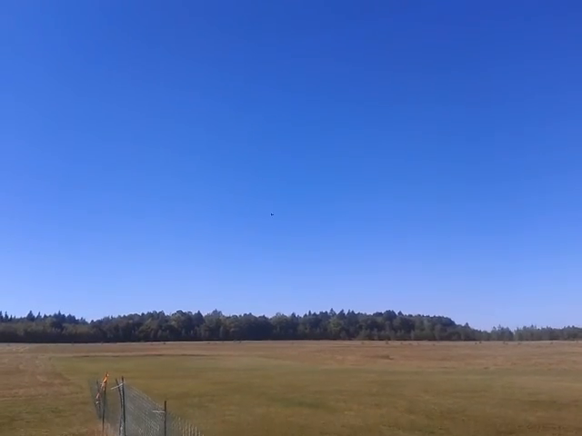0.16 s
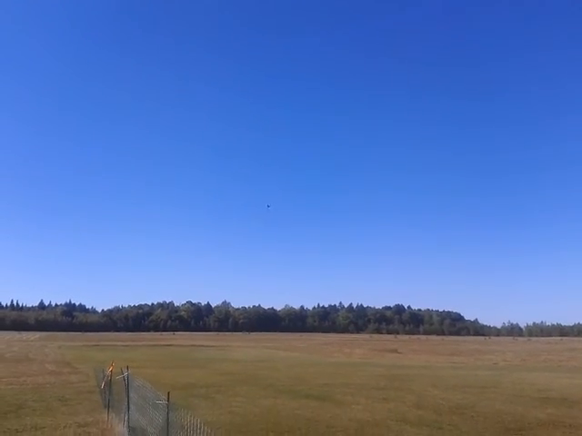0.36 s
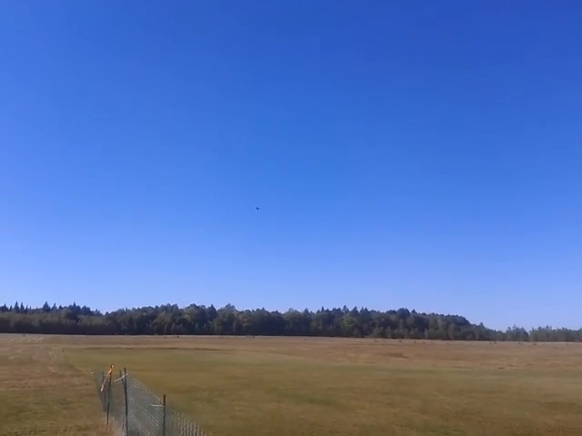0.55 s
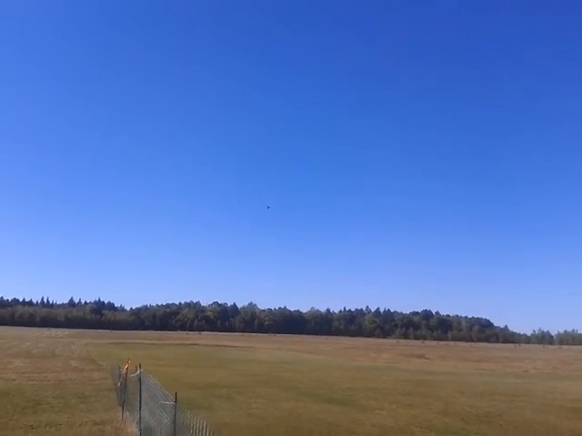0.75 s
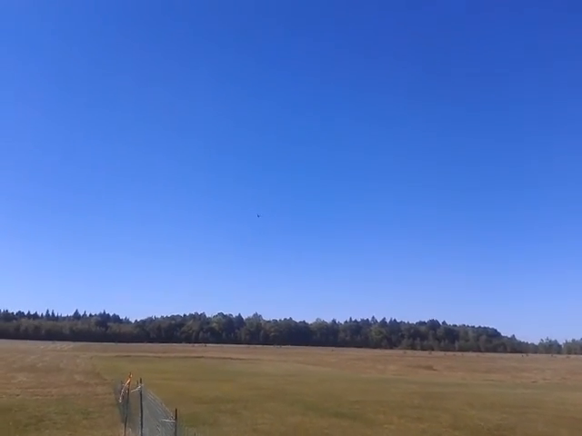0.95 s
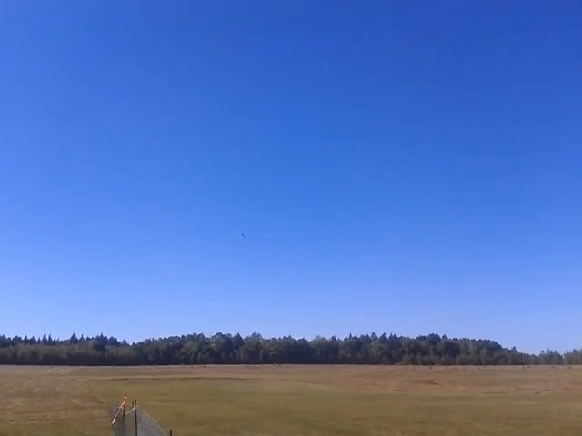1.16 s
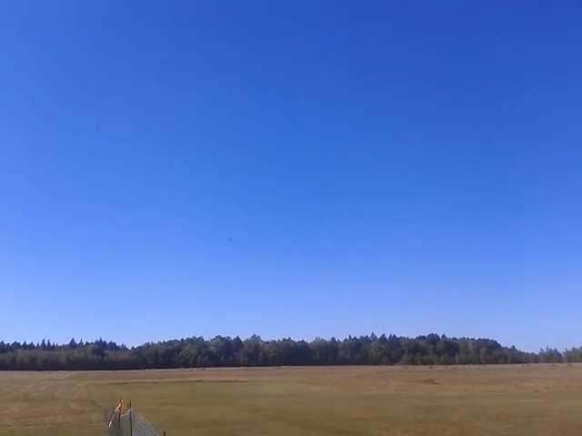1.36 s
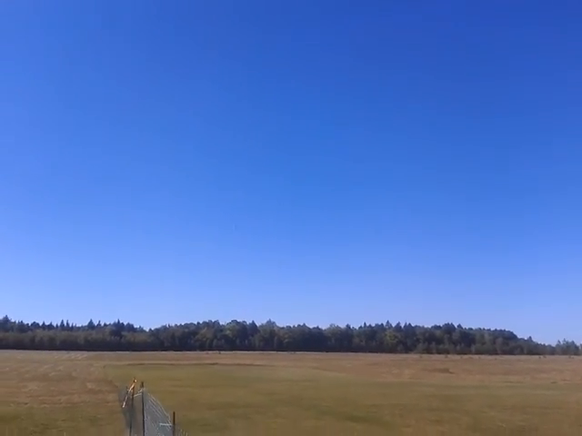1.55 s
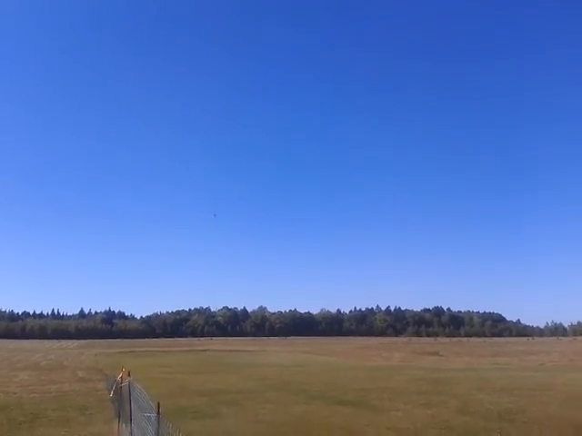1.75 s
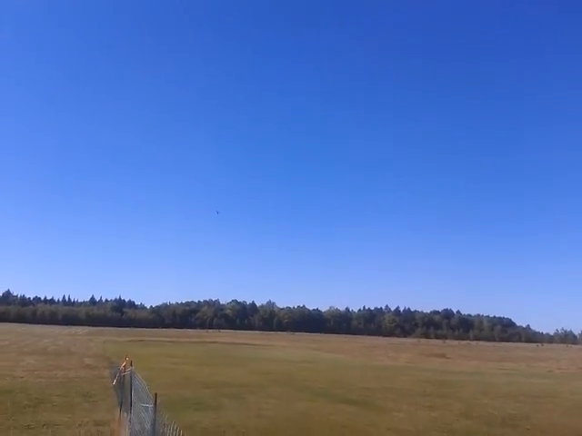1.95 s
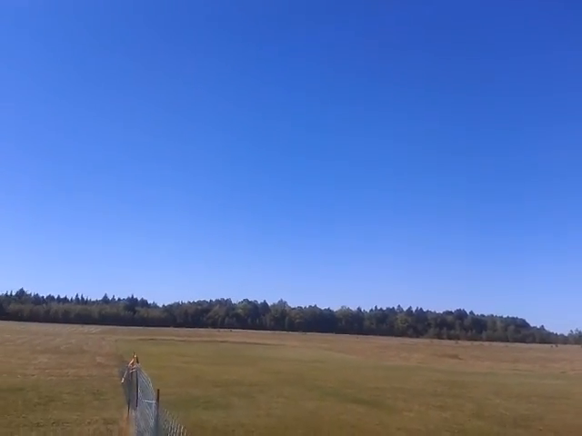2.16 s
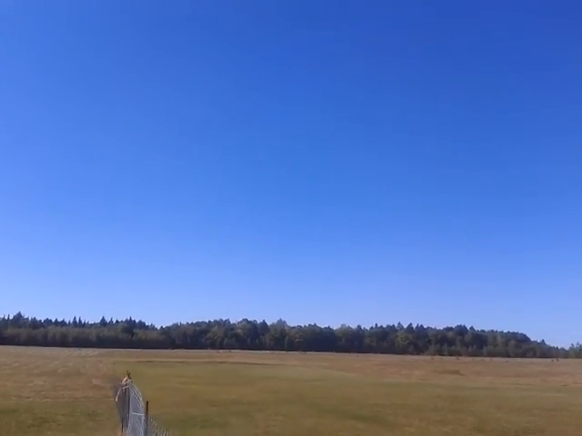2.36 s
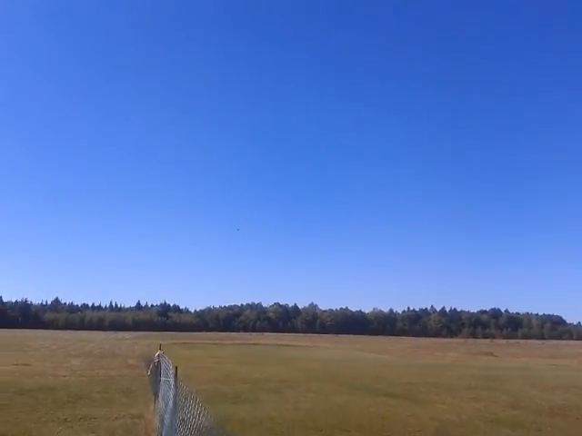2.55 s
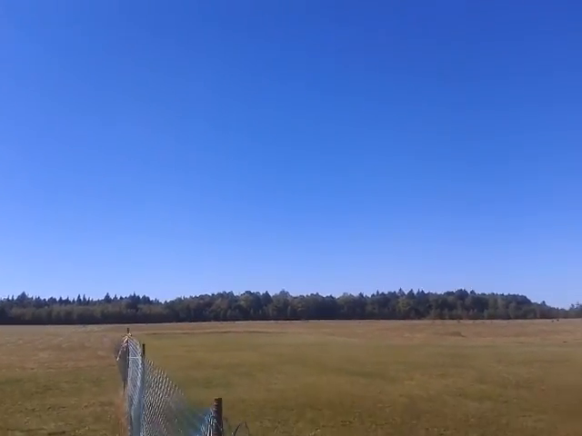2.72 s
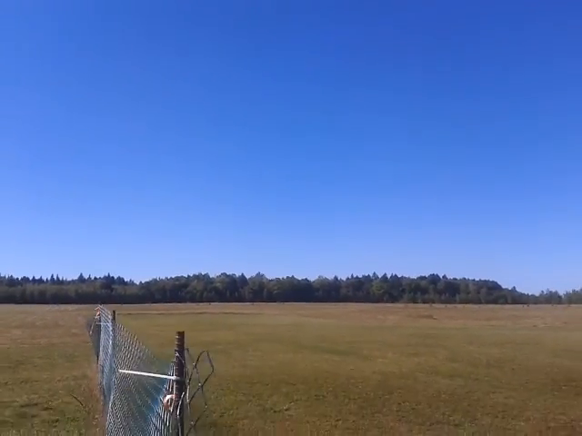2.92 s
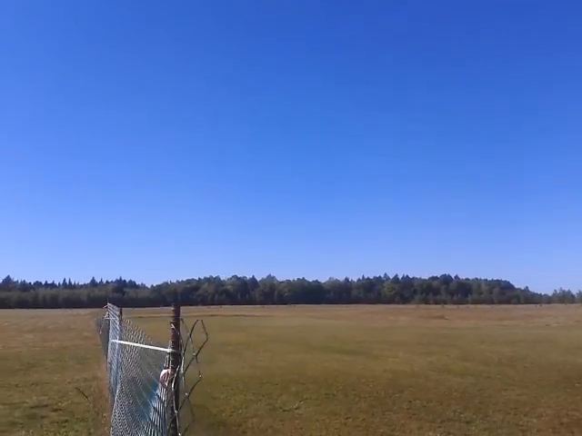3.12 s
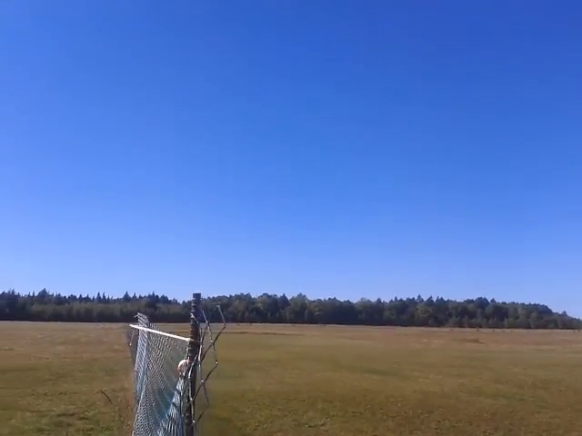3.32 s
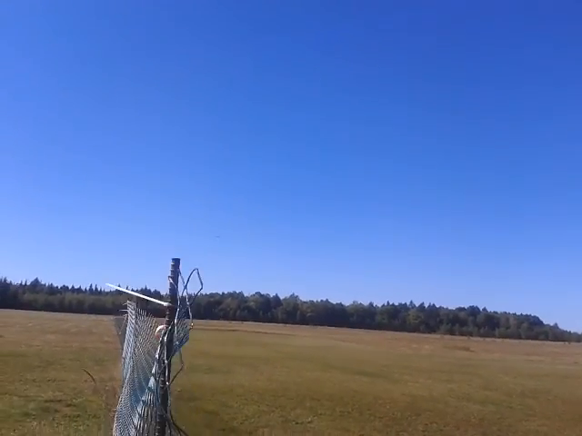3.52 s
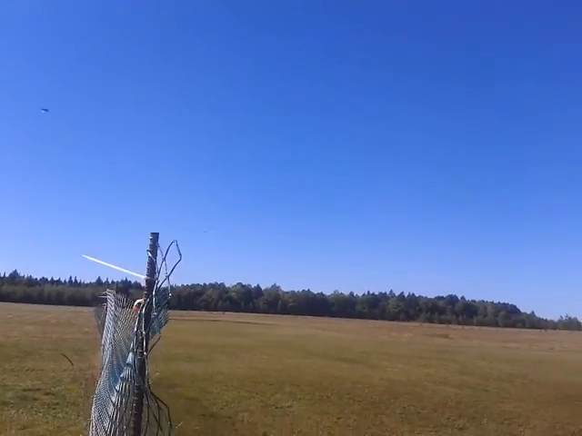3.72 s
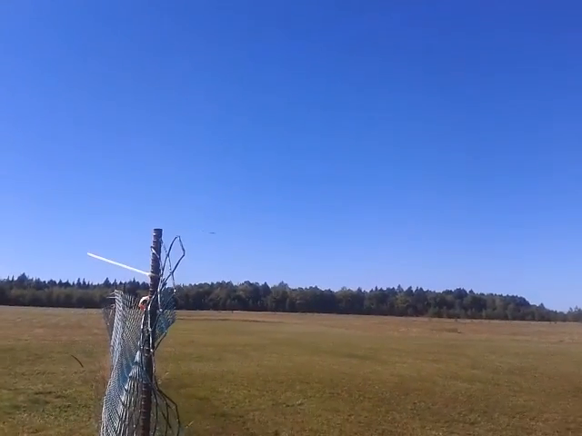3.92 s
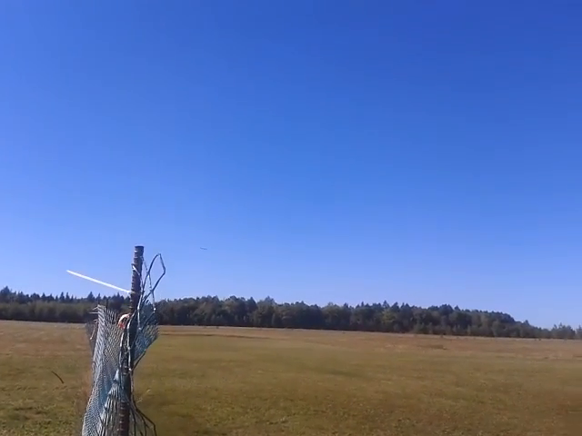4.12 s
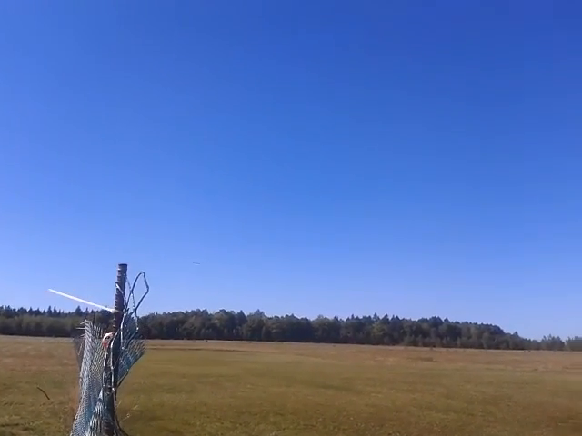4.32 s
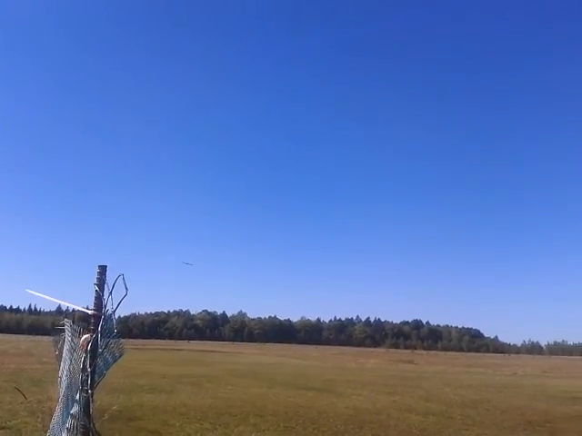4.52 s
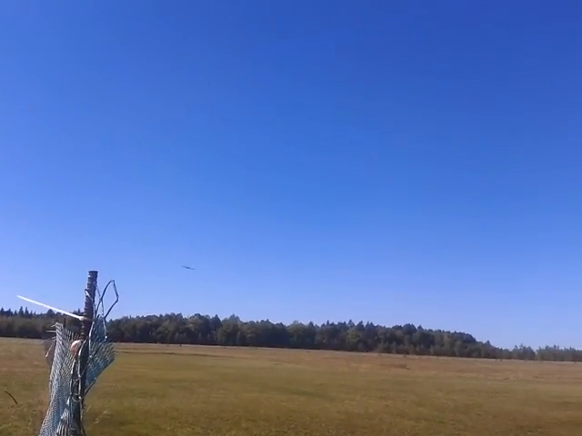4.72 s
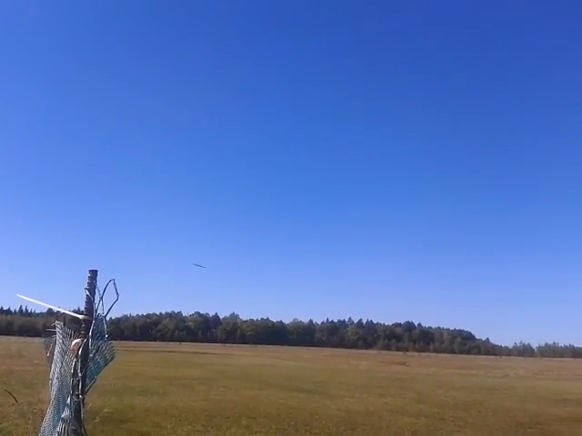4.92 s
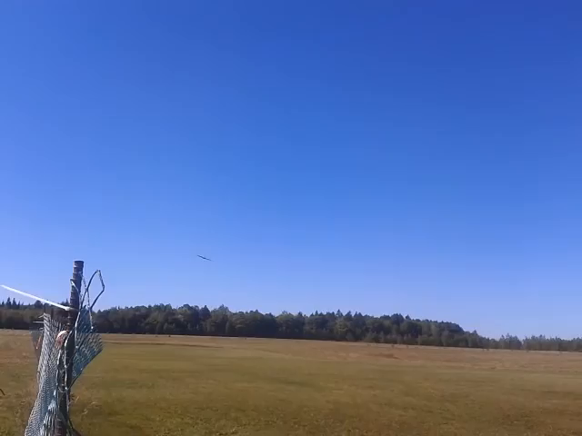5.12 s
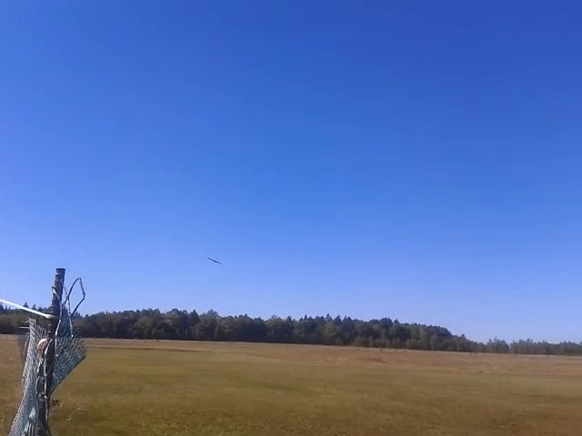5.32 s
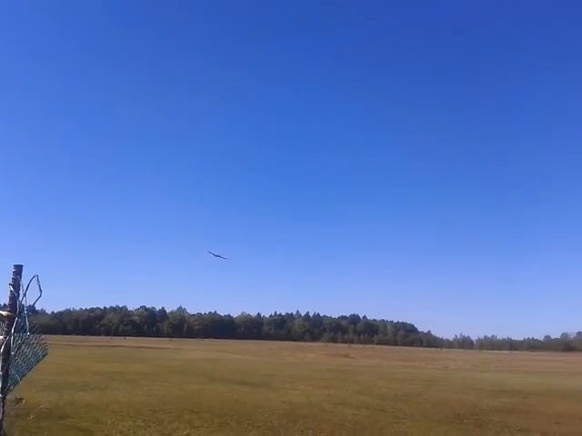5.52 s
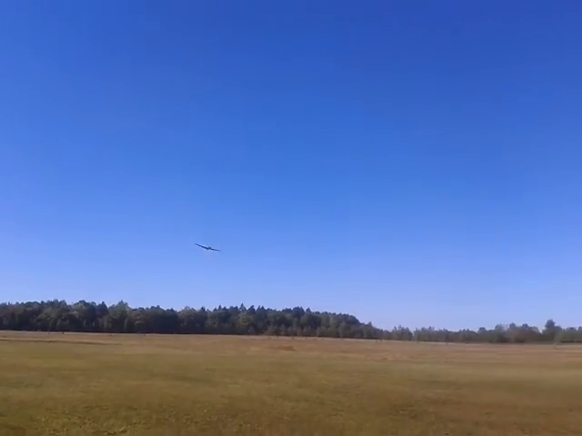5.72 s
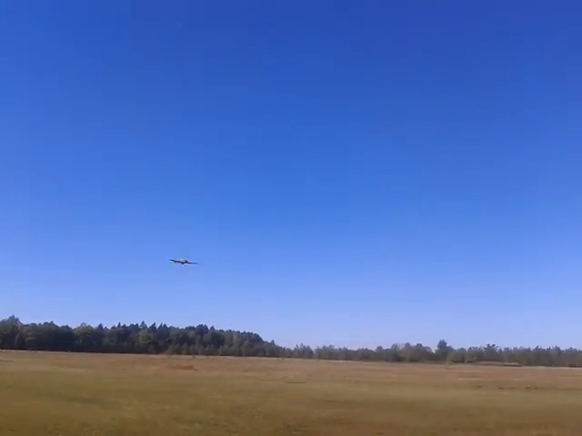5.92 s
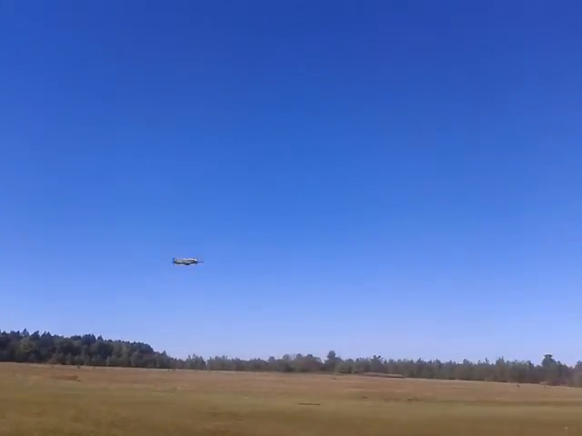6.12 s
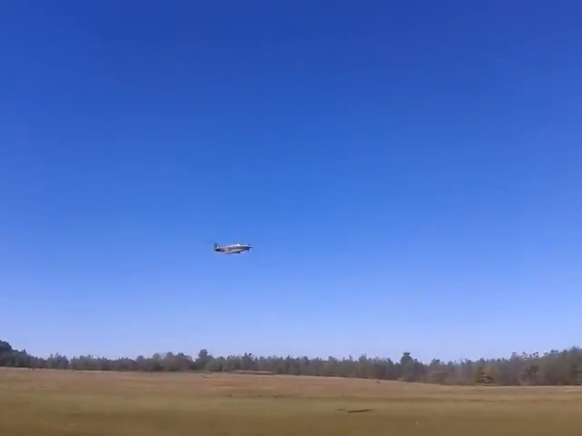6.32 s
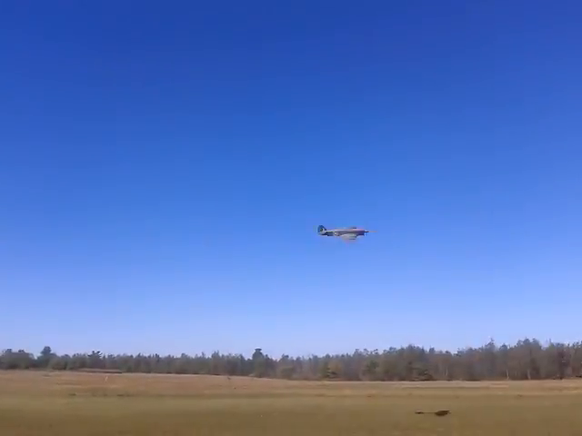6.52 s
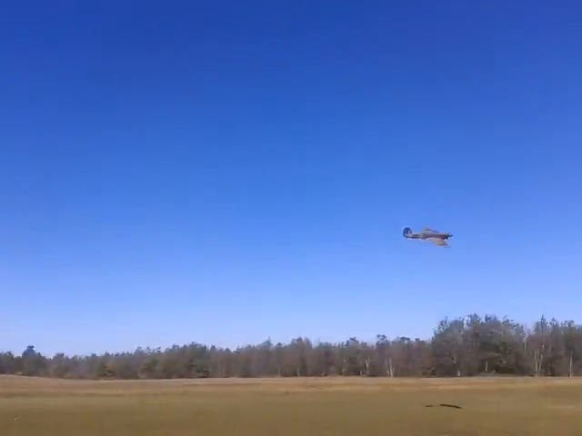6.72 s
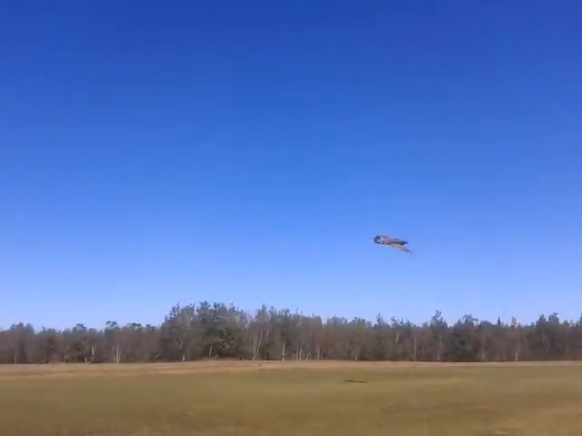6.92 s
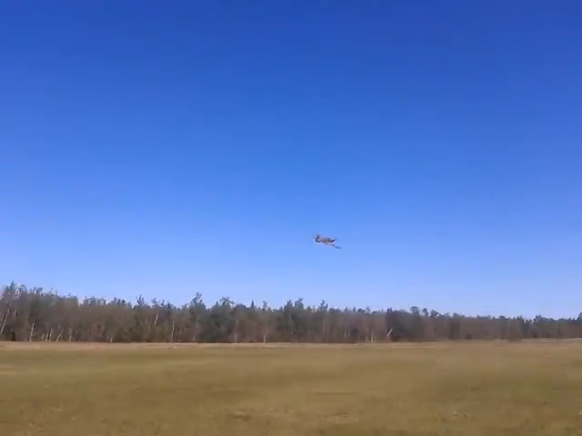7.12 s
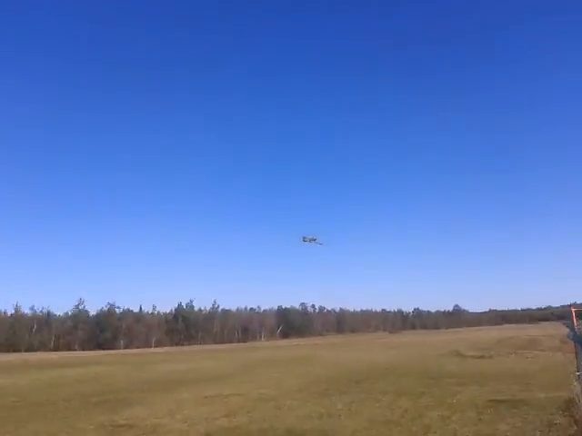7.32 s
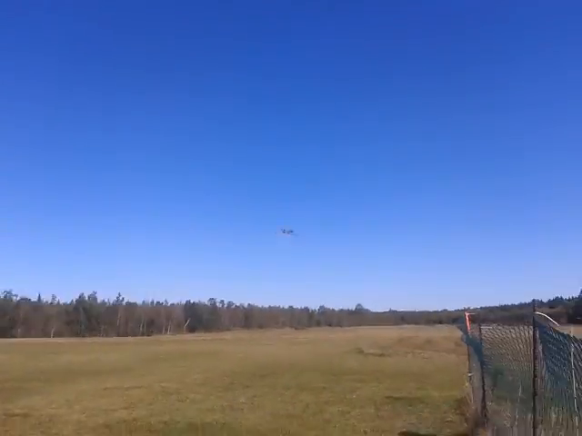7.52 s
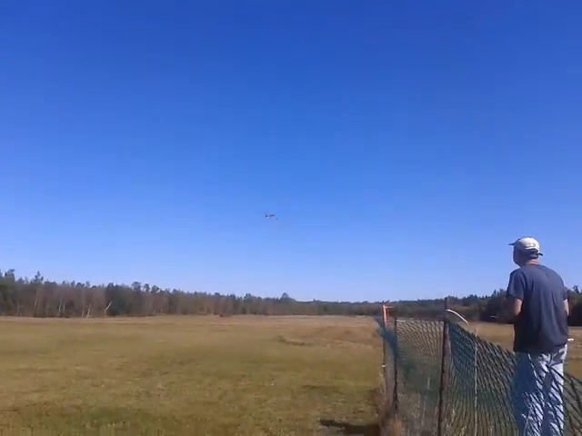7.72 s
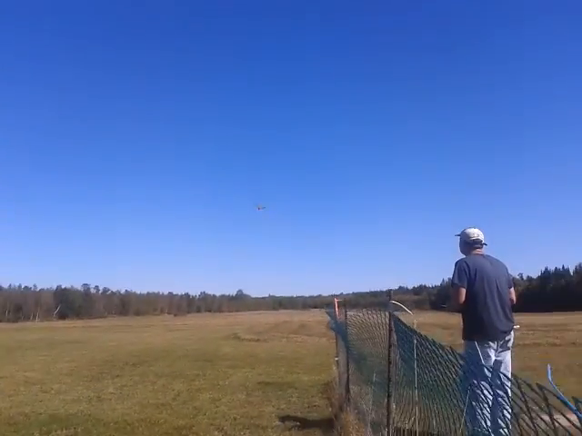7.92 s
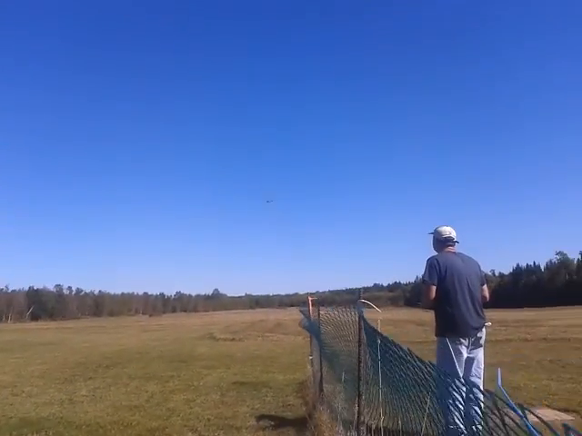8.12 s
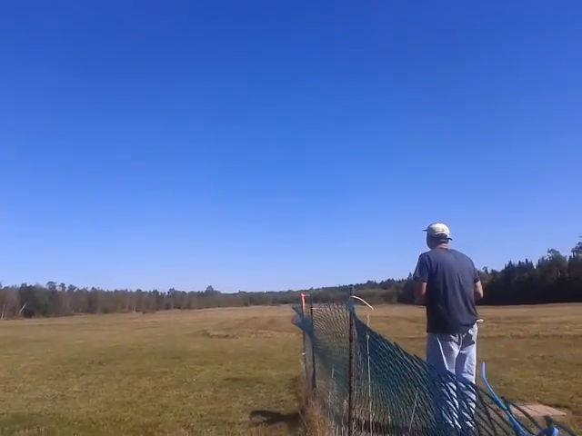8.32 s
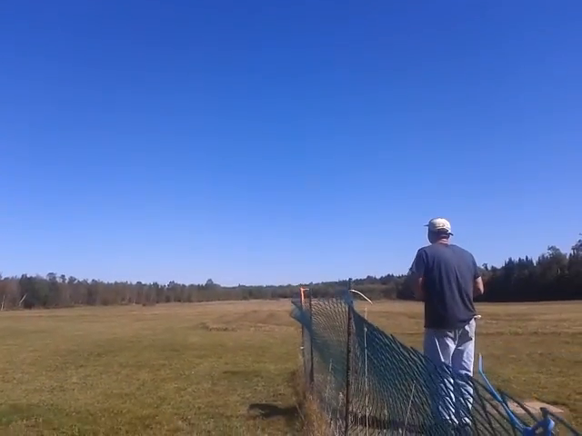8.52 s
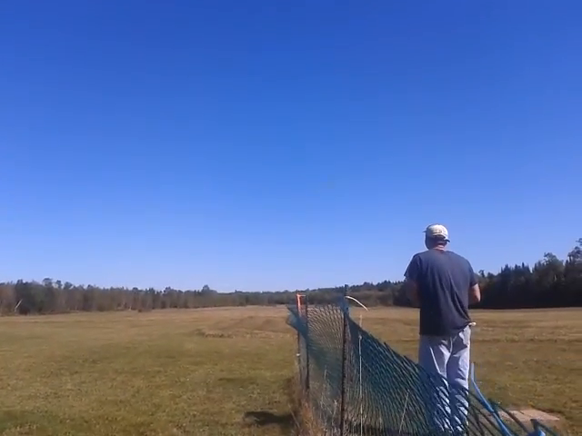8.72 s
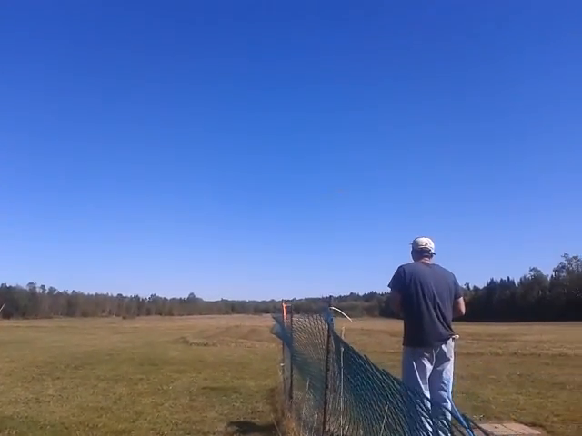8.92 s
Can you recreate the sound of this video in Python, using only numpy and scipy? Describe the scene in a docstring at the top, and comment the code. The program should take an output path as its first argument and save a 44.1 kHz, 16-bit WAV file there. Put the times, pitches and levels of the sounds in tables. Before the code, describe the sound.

Outdoors on a quiet grass field by a wood, a small four-stroke model aeroplane drones while turning far off, then dives closer with a rising, raspy buzz. It passes at about six and a half seconds, pitch sliding down, and flies away with a hissy tail. A high bush cricket trills faintly; a few dry ticks and scuffs sit near the microphone.

```python
"""Over a grass field beside a wood, a model aeroplane with a four-stroke glow engine turns in, passes close and flies off.
Stacked sine orders of the firing rate make its exhaust and low drone; shaped noise makes its rasp and hiss.
Their levels and colours change with the side it shows; a delayed ground echo sweeps through exhaust and noise.
The wood returns a scattered, late echo. A bush cricket trills with arched notes and scrapes nearby;
noise and short tones make the still air and a few dry ticks, scuffs and peeps."""
import sys
import numpy as np
from scipy import signal
from scipy.fft import rfft, irfft, next_fast_len
from scipy.io import wavfile
from scipy.ndimage import map_coordinates

SR = 44100
rng = np.random.default_rng(int(sys.argv[2]) if len(sys.argv) > 2 else 0)


def unload_wav(signal):
    """Save mono or channel-first audio to the path in sys.argv[1] as 16-bit WAV at rate SR, clipped to [-1, 1]."""
    wavfile.write(
        sys.argv[1],
        SR,
        np.round(np.clip(np.atleast_2d(signal).T, -1, 1) * 32767).astype(np.int16),
    )


N = 399546
TIME = np.arange(N) / SR

# low tones at whole multiples of the firing rate: order, levels_db (eight sides, tail to nose),
# loss_db (per doubling of distance), banked_gain_db
LOW_TONES = [(3, [-52, -51, -65, -66, -60, -56.5, -62.5, -58], 6, 22),
             (4, [-51.5, -58.5, -42.5, -31, -30, -36.5, -52, -51], 9.5, 3.5),
             (6, [-51.5, -44, -34.5, -31, -34, -46, -48, -32.5], 7, 17.5),
             (8, [-27, -40.5, -31.5, -38, -33, -32.5, -39.5, -36.5], 10, 6)]
PASS_DISTANCE_M = 29.6
BANK_S = 2.33   # when the wings are steepest
SOUND_M_PER_S = 343


def from_db(db):
    """Decibels to gain."""
    return 10 ** (np.asarray(db) / 20)


def rms_one(x):
    """Scale to unit power."""
    return x / np.sqrt(np.mean(x ** 2) + 1e-20)


def in_time(rows, at=TIME):
    """The columns of a curve table, joined by straight lines."""
    s, *columns = np.transpose(rows)
    return [np.interp(at, s, column) for column in columns]


def drift(rate, at=TIME):
    """Slow chance of spread 1, changing about rate times a second."""
    pole = np.exp(-80 * np.pi * rate / SR)
    # drawn once every 40 samples; the start is dropped while the filter settles
    slow = rng.standard_normal(N // 40 + 2002)
    slow = signal.lfilter([1], [1, -2 * pole, pole * pole], slow)[2000:]
    return np.interp(at * SR / 40, np.arange(len(slow)), rms_one(slow))


def noise(spectrum):
    """Noise of unit power, coloured by a relative spectrum (Hz, dB per Hz)."""
    hz, db = np.transpose(spectrum)
    size = next_fast_len(N)
    bins = np.maximum(np.fft.rfftfreq(size, 1 / SR), 1)
    gain = from_db(np.interp(np.log(bins), np.log(hz), db))
    gain *= np.minimum(1, hz[-1] / bins) ** 4   # steep fall above the last point
    white = rfft(rng.standard_normal(size))
    return rms_one(irfft(white * gain, size)[:N])


def bump(centre_s, length_s):
    """A smooth bell in time that rises to 1."""
    return np.exp(-((TIME - centre_s) / length_s) ** 2)


def still_air():
    """A steady bed of coloured noise stands for the still air over the field."""
    # colour of the air: pitch_hz, level_db (relative, per Hz)
    air_colour = [(25, -13), (70, -20), (130, -16.5), (220, -13.5), (350, -5), (600, -5.5), (1200, -3.5),
                  (2500, -8.5), (5000, -5.5), (7000, -24), (8700, -5.5), (10000, -27), (15800, -20)]
    return from_db(-54.5) * noise(air_colour)


def ticks(ring_hz, decay_s, snap):
    """A sharp, thin snap and a millisecond of ring."""
    # dry ticks: start_s, level_db (before the high-pass)
    tick_list = [(0.697, -35), (1.358, -39), (1.5447, -25), (1.855, -31.5), (2.201, -45), (2.3775, -30),
                 (3.2553, -31), (3.3559, -35)]
    out, t = np.zeros(N), TIME[:400]
    for s, db in tick_list:
        ring = np.sin(2 * np.pi * ring_hz * t) * (t / decay_s) * np.exp(1 - t / decay_s)
        crack = snap * rng.standard_normal(len(t)) * np.exp(-t / decay_s)
        out[round(s * SR):][:len(t)] += from_db(db) * (ring + crack)
    return signal.lfilter(*signal.butter(2, 2500, "high", fs=SR), out)


def scuffs():
    """Brief dull swells of friction noise."""
    # scuffs and soft bumps: centre_s, level_db, length_s, lowest_hz, top_hz
    scuff_list = [(0.395, -45, 0.013, 346, 450), (0.412, -47.5, 0.041, 1200, 4200),
                  (1.137, -47.5, 0.013, 220, 3500), (1.235, -52, 0.11, 1200, 4350),
                  (1.44, -51, 0.041, 1300, 2800), (4.669, -47.5, 0.02, 450, 1600),
                  (9.019, -46, .015, 300, 1197)]
    out = np.zeros(N)
    for s, db, length, low_hz, top_hz in scuff_list:
        flutter = from_db(1.0 * drift(84))
        friction = noise([(low_hz / 2, -28), (low_hz, 0), (top_hz, -7), (9000, -28)])
        out += from_db(db) * bump(s, length) * flutter * friction
    return out


def peeps(octave_db):
    """Short wavering notes with a weak octave."""
    # peeps: centre_s, level_db, pitch_hz (before the waver), length_s
    peep_list = [(1.442, -42, 1386, 0.014), (2.217, -42.5, 3770, 0.0029)]
    out, waver = np.zeros(N), np.cumsum(1 + 0.035 * drift(152)) / SR
    for s, db, hz, length in peep_list:
        turn = 2 * np.pi * hz * waver
        note = np.sin(turn) + from_db(octave_db) * np.sin(2 * turn)
        out += from_db(db) * bump(s, length) * note
    return np.sqrt(2) * out


def cricket(strokes_per_s, top_hz, arch_hz, width, start):
    """Each wing stroke speeds up and slows down, so its note arches; the return stroke only scrapes faintly."""
    # loudness of the trill: start_s, level_db
    trill_level = [(0, -61.5), (.8, -53), (1.5, -49.5), (2.2, -58.5), (2.7, -51.5), (3.1, -45.5),
                   (3.7, -46.5), (4.3, -43.5), (5, -46), (5.6, -52), (7.2, -44), (8, -56), (9.06, -81)]
    stroke = (strokes_per_s * TIME + start + 0.0326 * drift(0.87)) % 1 - .5
    arch = arch_hz * np.minimum((stroke / width) ** 2, 4)
    hz = top_hz - arch + 70 * drift(400) + 60 * drift(3)
    note = np.sqrt(2) * np.sin(2 * np.pi * np.cumsum(hz) / SR) * from_db(2.0 * drift(160))
    scrape = .45 * noise([(6500, -50), (8000, -14), (8800, 0), (9300, -1), (9900, -22), (11000, -50)])
    closing = np.exp(-((stroke - .02) / width) ** 2)
    opening = 0.92 * np.exp(-((stroke + 0.29) / width) ** 2)
    level_db = in_time(trill_level)[0] + 1.16 * drift(6)
    return from_db(level_db) * (closing * (note + scrape) + opening * scrape)


def off_the_trees(x, gap_s, t60_s, dull_hz):
    """The edge of the wood scatters the engine back, late and dull, smearing each line."""
    # echo gain, strongest as the aeroplane dives in front of the wood: start_s, level_db
    wood_level = [(0, -15), (2.4, -11), (3.2, -7), (3.9, -15.5), (6.3, -16), (7.3, -15), (9.06, -9)]
    t = TIME[:2 * SR]
    onset = 1 - np.exp(-(t / gap_s) ** 2)
    tail = rng.standard_normal(len(t)) * from_db(-60 * t / t60_s) * onset
    echo = signal.fftconvolve(x, tail / np.linalg.norm(tail))[:N]
    echo = signal.sosfilt(signal.butter(2, [450, dull_hz], "band", fs=SR, output="sos"), echo)
    return from_db(in_time(wood_level)[0]) * echo


def over_grass(x, lag_ms, strength, turnover_hz, scatter_hz):
    """Add the ground echo: soft turf returns the bass upright, inverts the middle and scatters the treble away."""
    c = np.tan(np.pi * turnover_hz / SR)
    echo = signal.lfilter([c - 1, c + 1], [c + 1, c - 1], x)   # all-pass: turns phase only
    echo = signal.filtfilt(*signal.butter(2, min(scatter_hz, .4 * SR), fs=SR), echo)
    strength = strength / (1 + (lag_ms / 2.1) ** 8)   # a steep echo sinks into the turf
    lag_ms = lag_ms + 0.032 * drift(4.1)   # the ground is uneven
    return x + strength * map_coordinates(echo, [np.arange(N) - lag_ms * SR / 1000], order=1)


def flight():
    """A turn onto a straight pass sets the Doppler-shifted firing rate (Hz), distance (m) and ground lag (ms)."""
    # it dives, levels out and climbs away: start_s, height_m
    height = [(0, 73), (.8, 59), (2.15, 40), (2.6, 34.6), (3.0, 22.8), (3.9, 12.2), (4.9, 7.3), (6.0, 4.84),
              (6.35, 5.07), (6.6, 5.4), (6.85, 5.07), (7.2, 4.4), (8.1, 8.34), (9.06, 15.1)]
    # the engine stays near full speed: start_s, firing_hz (on board)
    revs = [(0.03, 94), (1.14, 92.14), (1.53, 92.47), (1.89, 91.6), (2.52, 92.9), (2.79, 92.7),
            (3.3, 93.27), (3.48, 92.3), (3.81, 93.1), (3.96, 92.6), (4.05, 93.6), (4.47, 91.65),
            (4.74, 91.97), (5.25, 93.5), (5.58, 92.53), (5.7, 92.7), (5.79, 92.4), (6.0, 92.65),
            (6.18, 90.84), (6.33, 91.6), (6.42, 91.85), (6.72, 91.33), (6.87, 92.16), (7.08, 91.78),
            (7.29, 92.44), (7.35, 90.86), (7.38, 91.55), (7.71, 92.9), (8.01, 91.26), (8.25, 91.97),
            (8.61, 92.3), (9.03, 93.77)]
    speed_m_per_s, pass_s, ear_height_m = 46.4, 6.66, 1.5
    turn_degrees, turn_end_s = 103.4, 4.38
    along = speed_m_per_s * (TIME - pass_s)
    off_course = np.radians(turn_degrees) * np.clip(1 - TIME / turn_end_s, 0, 1)
    closing = -speed_m_per_s * np.cos(off_course) * along / np.hypot(along, PASS_DISTANCE_M)
    flown = np.cumsum(closing) / SR
    distance = PASS_DISTANCE_M + flown.max() - flown
    firing_hz = in_time(revs)[0] / (1 - closing / SOUND_M_PER_S)
    lag_ms = 2000 * ear_height_m * in_time(height)[0] / distance / SOUND_M_PER_S
    return firing_hz, distance, lag_ms


def facing(view, sides):
    """The share of each side of the aeroplane in what is heard, as the view moves from one to the next."""
    return [np.interp(view, sides, one) for one in np.eye(len(sides))]


def arriving(sides_db, firing_hz, distance, loss_db_per_m):
    """Level of a layer at the listener: what the facing side sends out, less spreading and loss in the air."""
    # the Doppler shift tells the side: firing_hz as heard from behind, abeam, obliquely ahead, ahead
    four_sides = [82, 92, 101, 106]
    spreading_db = 20 * np.log10(distance / PASS_DISTANCE_M)
    air_loss_db = loss_db_per_m * (distance - PASS_DISTANCE_M)
    return np.interp(firing_hz, four_sides, sides_db) - spreading_db - air_loss_db


def puffs(cycles, depth_db, uneven_db):
    """Gas leaves in one puff per firing, uneven in strength."""
    return rms_one(from_db(depth_db * np.cos(2 * np.pi * cycles) + uneven_db * drift(73)))


def jet():
    """Climbing away, the exhaust jet points at the listener for a moment: a smooth, bright swell of hiss."""
    # colour of the jet: pitch_hz, level_db (relative, per Hz)
    jet_colour = [(3000, -30), (4600, -16), (5450, 3), (6100, -9), (7400, -10), (9000, -23), (11000, -24),
                  (15800, -20)]
    return from_db(-40) * bump(8.37, length_s=0.3) * noise(jet_colour)


def rush(cycles, firing_hz, distance):
    """Rasp of the exhaust jet and hiss of the blade tips, whose colour turns with the aeroplane."""
    # the treble swells and fades on its way: start_s, level_db
    treble_swell = [(0, 7.5), (.6, -12), (1.25, 0), (1.65, -2), (2.0, 2.5), (2.6, 0.5), (2.85, 8),
                    (3.2, 5.5), (3.6, 2), (3.8, 8.5), (4.1, 3), (4.5, 2.5), (4.9, -0.3), (6.45, 2.5),
                    (7.0, -1.3), (8.0, 0), (8.55, 5.5), (9.06, -1.5)]
    # layer levels at the passing distance, before the swell: level_db behind, abeam, oblique, ahead
    rasp_sides = [-38, -39, -36, -35]
    hiss_sides = [-33, -35.5, -34.5, -33]
    sizzle_sides = [-61, -62, -60, -77]
    # noise colours: pitch_hz, level_db (relative, per Hz)
    rasp_colour = [(40, -70), (100, -52), (200, -32), (320, -12), (450, -7.5), (650, 0.5), (950, 0.5),
                   (1250, -2), (1700, 0.5), (2200, 2), (2650, -7), (3500, -5), (4500, -8)]
    behind_colour = [(2500, -27), (3600, -11), (4300, -2.5), (4650, 0), (4950, 0), (5400, 3), (6000, -5.5),
                     (7200, -13), (9000, -9), (11000, -23), (15800, -33)]
    abeam_colour = [(2500, -22), (3800, -11), (4500, 2), (5200, 4.5), (6000, 0.5), (7200, -12.5),
                    (8800, -3.5), (10000, -8.5), (11500, -16), (15800, -26)]
    oblique_colour = [(2500, -26), (3100, -19), (3600, -7.5), (4100, 2.5), (4900, 8), (5800, -6.5),
                      (7000, -3.5), (8500, -4), (10000, -15), (12000, -16), (15800, -27)]
    ahead_colour = [(2700, -28), (3700, -18), (4050, -4), (4350, 2), (4850, -2.5), (5450, -4),
                    (6000, -14.5), (6600, -9), (7500, -14), (9000, -15), (10500, -28.5), (15800, -42)]

    # hiss fades faster with distance than rasp; the sizzle on top swells the most
    swell_db, = in_time(treble_swell)
    rasp_db = arriving(rasp_sides, firing_hz, distance, loss_db_per_m=0.02) + 0.51 * swell_db
    rasp_db = rasp_db - 5 * bump(BANK_S, length_s=0.32)   # the raised wing briefly shades the rasp
    hiss_db = arriving(hiss_sides, firing_hz, distance, loss_db_per_m=0.06) + swell_db
    sizzle_db = arriving(sizzle_sides, firing_hz, distance, loss_db_per_m=0) + 1.8 * swell_db

    rasp = noise(rasp_colour) * from_db(rasp_db) * puffs(cycles, depth_db=-3.5, uneven_db=1.5)
    # square roots of the shares keep the power even as the colours cross-fade
    behind, abeam, oblique, ahead = np.sqrt(facing(firing_hz, [83, 94, 99, 106]))
    hiss = behind * noise(behind_colour) + abeam * noise(abeam_colour)
    hiss += oblique * noise(oblique_colour) + ahead * noise(ahead_colour)
    hiss *= from_db(hiss_db)
    hiss += from_db(sizzle_db) * noise([(6000, -25), (9500, -10), (12000, 1), (15800, 2)])
    nearness = np.sqrt(PASS_DISTANCE_M / distance)   # distance blurs the puffs together
    throb = puffs(cycles, depth_db=3.0 * nearness, uneven_db=1.6 * nearness)
    return rasp + hiss * from_db(1.3 * drift(5.0)) * throb


def drone(cycles, firing_hz, distance):
    """Clean low tones at whole multiples of the firing rate; each has its own beam, which tips as the wings bank."""
    # the low tones beam narrowly: firing_hz as heard from eight sides, tail to nose
    eight_sides = [81.5, 84, 87, 90, 94, 98, 102, 106]
    doublings = np.log2(distance / PASS_DISTANCE_M)
    bank = bump(BANK_S, length_s=.95)
    out = np.zeros(N)
    for order, sides_db, loss_db, banked_db in LOW_TONES:
        db = np.interp(firing_hz, eight_sides, sides_db) - loss_db * doublings + banked_db * bank
        out += from_db(db) * np.sin(2 * np.pi * (round(order) * cycles + rng.random()))
    return np.sqrt(2) * out


def exhaust(cycles, firing_hz, distance, flutter_db, flutter_per_s, wander, smear, ring_delay, count=72):
    """One bang per firing, as a stack of orders; the silencer's ring near order 20 comes late in each cycle."""
    # the note waxes and wanes as the aeroplane rocks: start_s, level_db, brightness_db (per octave)
    rocking = [(0, 0.5, -1), (.35, -3.5, 0), (1.2, 2.5, 0), (1.7, -5.5, 2.5), (2.2, 1.5, 0.5), (2.6, 2, -1),
               (2.8, 4, 1), (3.2, 0.5, 0), (3.6, -0.5, -0.5), (4.0, -1, -0.5), (4.45, 1, 1),
               (4.9, -1.5, -1), (5.45, 0.5, 1.5), (6.0, 1, 0), (6.4, -3.5, 3), (6.6, -1, 0.5),
               (6.8, -1.5, 1.5), (7.8, 1, 0), (9.06, 0, 0.5)]
    # what the engine radiates in level flight: order: level_db to each of six sides, tail to nose
    order_levels = {2: (-13, -9, -11, -12, -10.5, -15), 5: (-7, -16.5, -10, -1.5, -7.5, 0),
                    7: (-4.5, -11, -9, 0, -9, 2), 9: (-9.5, -13, -16, -9, -4.5, 3.5),
                    10: (-2.5, -18, -7, -14, 6, -3.5), 11: (-16, -12, -3.5, -3, -3, -15),
                    12: (-14, -13.5, -3.5, -5, -6, -17), 13: (-3, -9, -30, -14, -9, -11),
                    14: (-14, -8.5, -13, -6, -5, -8.5), 15: (-8.5, -14, -24, -15, -7, -5),
                    16: (-8, -8, 4.5, -2, -5, -6), 17: (-17, -14, -16, -5, -15, -10),
                    18: (-15.5, -22, -8, -2, -18, -2.5), 19: (-19.5, -1.5, -16, -5, -14, 3.5),
                    20: (-9.5, -12, -7, -14, 6.5, 3), 21: (-13, -12, -22, -18, -9, -9),
                    22: (-7, -16, -5, 4, -10, -15), 23: (-22, -16, -7, -18, -10, -10),
                    24: (-16, -8, -12, -19, 0, -11), 25: (-12, -17, -21, -15, -15, -23),
                    26: (-12.5, -6, -6, -14, -8, -14), 27: (-6, -11, -7, -10, -9, -8),
                    29: (-13, -7.5, -7, -13, -11, -26), 30: (-5.5, -6, -16, -19, -9, -9),
                    32: (-12, -10, -11, -23, -29, -28), 34: (-11, -17, -28, -11, -19, -16),
                    35: (-24, -20, -26, -6, -22, -7), 37: (-15, -26, -34, -29, -31, -23),
                    39: (-20, -18, -9, -34, -11, -10.5), 41: (-35, -41, -35, -4, -15, -4),
                    42: (-31, -33, -27, -11, -16, -13), 44: (-16.5, -25, -18, -8, -20, -5.5),
                    48: (-20.5, -26, -21, -12, -4, -16), 56: (-16, -11, -11, -14, -20, -24),
                    67: (-15, -15, -18, -30, -30, -24)}
    # firing_hz as heard from those six sides
    six_sides = [82, 86, 91.5, 97, 102, 106]
    # when it is side-on, banked, diving and level again: time_s
    attitude_times = [1.4, 2.45, 3.3, 3.85]
    # in the turn the orders slide through resonances of the side on show: pitch_hz, level_db
    side_on = [(200, -20.5), (660, -14), (850, -6.5), (950, -10), (1070, 0), (1160, -10), (1290, -1.5),
               (1440, -12), (1630, -5.5), (1790, -9), (1920, -11.5), (2130, -6.5), (2420, -19), (2560, -8),
               (2690, -9), (2790, -6.5), (3000, -24), (3700, -21), (4120, -11), (4500, -18.5), (6500, -38)]
    banked = [(200, -20), (510, -13), (910, -1), (1020, -9), (1130, -4), (1330, -12), (1540, -6.5),
              (1800, -14), (1960, 2), (2150, -12), (2350, -24), (2560, -13), (2780, -22), (3100, -30),
              (3700, -15), (4120, -14), (4500, -12), (6500, -36)]
    diving = [(200, -17.5), (530, -6.5), (740, 2.5), (950, -1), (1080, -3), (1380, -9), (1590, -1.5),
              (1800, -2), (1950, -16), (2120, 1), (2300, -16), (2550, -10), (2860, -6), (3100, -22),
              (3400, -18), (3700, -9.5), (4300, -8), (6500, -36)]

    # levels move slowly, so they are worked out every 200 samples
    coarse, firing_hz, distance = TIME[::200], firing_hz[::200], distance[::200]
    swell_db, tilt_db = in_time(rocking, coarse)
    orders, sides = list(order_levels), np.transpose(list(order_levels.values()))
    *turning, straight = facing(coarse, attitude_times)
    shares = facing(firing_hz, six_sides)
    level_db = -35.5 + swell_db - 20 * np.log10(distance / PASS_DISTANCE_M)
    low_orders = [round(tone[0]) for tone in LOW_TONES]   # left to the drone
    out, offset = np.zeros(N), 0
    for k in range(2, count):
        offset += ring_delay * np.exp(-((k - 20) / 6) ** 2) + smear * rng.standard_normal()
        if k in low_orders:
            continue
        beam_db = sum(share * np.interp(k, orders, side) for share, side in zip(shares, sides))
        turn_db = sum(share * np.interp(k * firing_hz, *np.transpose(colour))
                      for share, colour in zip(turning, (side_on, banked, diving)))
        db = level_db + straight * beam_db + turn_db + tilt_db * np.log2(k * firing_hz / 1000)
        # turbulent air shakes high orders most, and more from afar
        shake = np.sqrt(min(k, 30) / 20) * (distance / PASS_DISTANCE_M) ** .3
        flutter = drift(flutter_per_s, coarse) + .5 * drift(9, coarse) - .2 * shake
        fading_db = flutter_db * shake * flutter
        late = np.interp(TIME, coarse, offset + wander * shake * drift(3.8, coarse))
        gain = np.interp(TIME, coarse, from_db(db + fading_db))
        out += gain * np.sin(2 * np.pi * (k * cycles - late))
    return out


def scene():
    """The small sounds of the field, and the aeroplane over the grass."""
    small = ticks(ring_hz=5800, decay_s=0.00021, snap=1.0) + scuffs() + peeps(octave_db=-10)
    insect = cricket(strokes_per_s=18.6, top_hz=8900, arch_hz=403, width=.13, start=.27)

    firing_hz, distance, lag_ms = flight()
    # the speed hunts a little and each firing comes slightly early or late
    hunting_hz = firing_hz * (1 + 0.0005006 * drift(6.06))
    cycles = np.cumsum(hunting_hz) / SR + 0.0009 * drift(42)
    air = over_grass(rush(cycles, firing_hz, distance) + jet(), lag_ms,
                     strength=.62, turnover_hz=450, scatter_hz=5500)
    air = signal.lfilter(*signal.butter(2, 110, "high", fs=SR), air)
    tones = drone(cycles, firing_hz, distance)
    engine = exhaust(cycles, firing_hz, distance, flutter_db=1.55, flutter_per_s=2.2,
                     wander=.02, smear=.17, ring_delay=.45)
    engine = engine * from_db(0.52 * drift(45))   # the firings are uneven in strength
    woods = off_the_trees(engine + tones, gap_s=0.025, t60_s=2.1, dull_hz=2170)
    engine = over_grass(engine, lag_ms, strength=0.54, turnover_hz=504, scatter_hz=5870)
    return (still_air() + small + insect + woods + air + tones + engine)[None]


def record(dry):
    """The top is cut steeply above 15.9 kHz."""
    return signal.sosfilt(signal.ellip(12, .1, 80, 15900, fs=SR, output="sos"), dry)


dry = scene()
out = record(dry)
unload_wav(out)
```